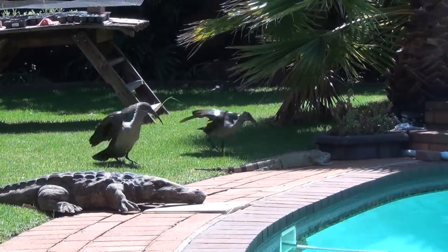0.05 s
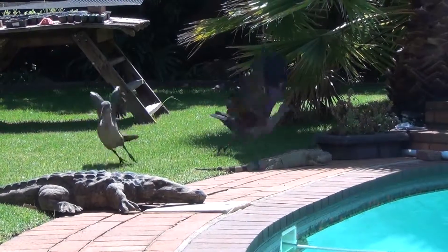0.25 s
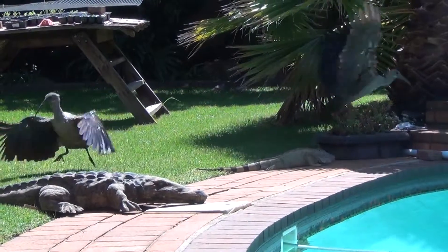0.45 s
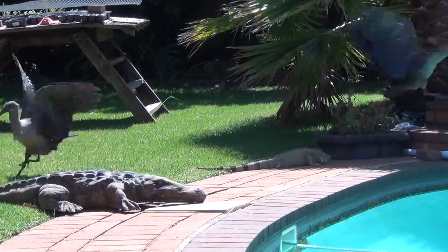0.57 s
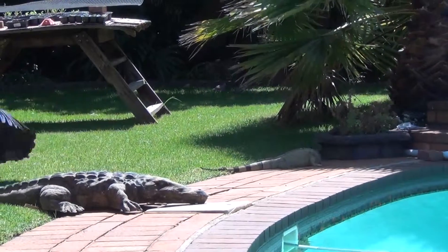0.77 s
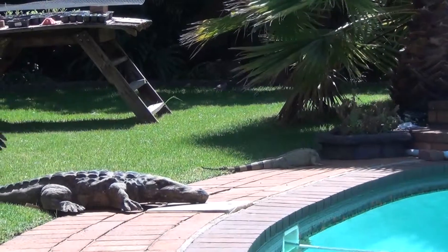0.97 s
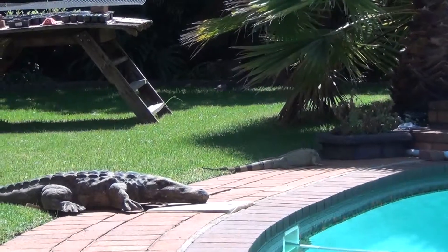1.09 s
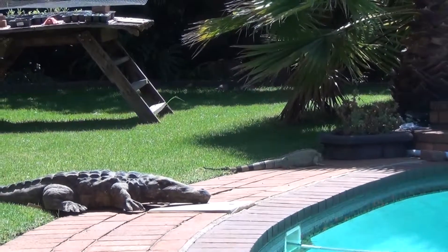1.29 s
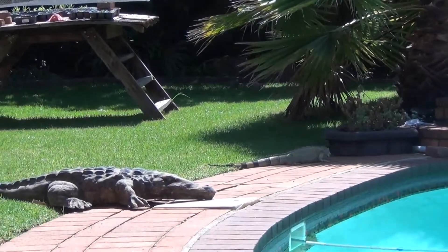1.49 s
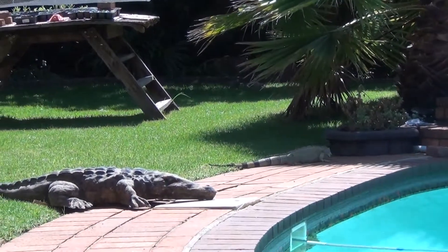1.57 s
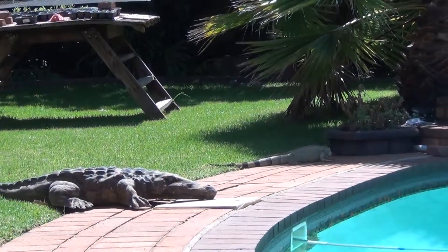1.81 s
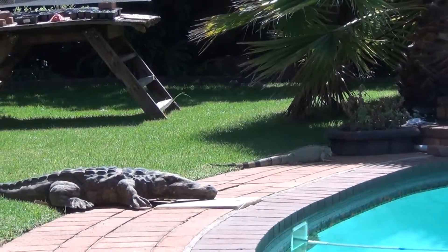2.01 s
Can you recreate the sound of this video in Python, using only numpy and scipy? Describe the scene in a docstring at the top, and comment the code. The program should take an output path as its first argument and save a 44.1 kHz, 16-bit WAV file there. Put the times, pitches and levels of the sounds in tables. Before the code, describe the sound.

Large birds flap their wings and take off, with faint pool water lapping behind.

```python
"""Large birds take off from a garden lawn beside a swimming pool.
Each wing stroke rustles the feathers and pushes a puff of air; in the first hard beats the wings clap,
and air squeezed from under them knocks. Bubbles plip and lap in the pool, small birds whistle and
chirp far off, and a little wind reaches the microphone towards the end."""
import sys
import numpy as np
from scipy import signal
from scipy.fft import rfft, irfft
from scipy.io import wavfile

SR = 44100
rng = np.random.default_rng(int(sys.argv[2]) if len(sys.argv) > 2 else 0)


def dump_mix(stems):
    """Bounce the given channels to the path in sys.argv[1] as a 16-bit WAV at rate SR."""
    frames = np.atleast_2d(stems).T  # one column per channel
    limited = np.clip(frames, -1, 1)  # hard clip at full scale
    pcm = np.round(limited * 32767).astype(np.int16)
    wavfile.write(sys.argv[1], SR, pcm)


N = 90404
TIME_S = np.arange(N) / SR
BINS_HZ = np.arange(N // 2 + 1) * SR / N

# Each row: peak time in seconds, rustle in dB, puff in dB, rise in seconds, fall in seconds.
WING_STROKES = [(0.126, -54, -60, 0.014, 0.023), (0.184, -50, -74, 0.0093, 0.015),
                (0.223, -45.5, -50, 0.019, 0.064), (0.289, -47.5, -71, 0.01, 0.013),
                (.334, -46, -47, 0.0062, 0.014), (0.381, -41.5, -44, 0.021, 0.026),
                (0.43, -42.5, -47.5, 0.016, .028), (0.506, -45.5, -60, 0.021, 0.039),
                (.575, -51.5, -53, 0.021, 0.13), (0.68, -41.5, -48, 0.017, 0.028),
                (0.762, -49.5, -52, 0.022, 0.042), (0.801, -50, -48.5, 0.01, 0.019),
                (0.856, -44.5, -49, 0.015, 0.053), (.977, -41, -51.5, 0.0082, 0.022),
                (1.096, -61, -54, 0.0032, 0.015), (1.165, -49, -79, 0.054, 0.12)]
# Each row: frequency in Hz, relative density in dB.
RUSTLE_SPECTRUM = [(400, 0), (1500, -6.5), (2500, -2), (4500, -4), (7000, -2.5), (8700, 0), (10700, 0),
                   (13000, -3), (15500, -24)]
# Each row: frequency in Hz, relative density in dB.
PUFF_SPECTRUM = [(60, -44), (130, -5.5), (210, -5.5), (320, -4), (450, -9), (720, -4), (1050, -14),
                 (1600, -8.5), (3000, -31)]
# Each row: frequency in Hz, left-right correlation.
WING_CORRELATION = [(200, .999), (800, 0.98), (1600, 0.96), (3000, 0.98), (6000, 0.92), (10000, 1)]

def wing_strokes():
    """Each stroke swells a feather rustle and a low puff of air together."""
    rustle = feathers(RUSTLE_SPECTRUM)
    puff = coloured(hiss(), PUFF_SPECTRUM, WING_CORRELATION)
    return sum(swell(s, rise_s, fall_s) * (from_db(rustle_db) * rustle + from_db(puff_db) * puff)
               for s, rustle_db, puff_db, rise_s, fall_s in WING_STROKES)


def feathers(spectrum):
    """Barbs slip over each other while air hisses through the vanes."""
    barbs = grains(per_s=5600, spread_db=2.5)
    return coloured(barbs + 0.75 * hiss(), spectrum, WING_CORRELATION)


# Each row: peak time in seconds, level in dB, treble lift in dB, rise in seconds, fall in seconds.
WING_CLAPS = [(0.3344, -35.5, -3, 0.0014, .0018), (0.3674, -31.5, -3, 0.0019, .0025),
              (0.3696, -28.5, -4.5, 0.00078, .0035), (.3746, -27.5, -7, 0.0008, 0.0041),
              (0.411, -40.5, 15.5, 0.0026, .002), (0.4123, -26.5, 3, 0.00017, 0.0015),
              (0.4137, -22.5, 0, 0.00092, 0.0019), (0.419, -30.5, 1.5, 0.00088, 0.0085)]
# Each row: frequency in Hz, relative density in dB.
SLAP_SPECTRUM = [(500, -22), (1100, -2), (1500, -14), (2200, -2.5), (5500, -1.5), (7200, -4.5),
                 (8500, -1.5), (10500, 2), (13000, -4), (15500, -12)]

def wing_claps(treble_above_hz=6040):
    """Flight feathers meet in a quick run of slaps, each a few milliseconds long."""
    slap = feathers(SLAP_SPECTRUM)
    body = signal.sosfiltfilt(signal.butter(2, treble_above_hz, fs=SR, output="sos"), slap)
    treble = slap - body
    return sum(from_db(db) * swell(s, rise_s, fall_s) * (body + from_db(lift_db) * treble)
               for s, db, lift_db, rise_s, fall_s in WING_CLAPS)


# Each row: peak time in seconds, pitch in Hz, level in dB, rise in seconds, fall in seconds.
WING_AIR_PULSES = [(.323, 263, -43, .003, .004), (.335, 740, -39, 0.0017, 0.0016),
                   (.3665, 232, -37, 0.0021, 0.0025), (.3735, 700, -36.5, 0.0027, 0.0033),
                   (.379, 217, -40.5, 0.0024, .005), (.4122, 713, -23.5, 0.00098, 0.0047),
                   (.4165, 254, -30.5, 0.0017, 0.0039), (.431, 700, -34, 0.00067, 0.005),
                   (.4455, 205, -38, 0.0022, 0.0074), (.474, 219, -36.5, 0.0026, 0.0027),
                   (.657, 625, -41.5, .004, 0.0063), (.6665, 219, -35.5, .003, .007),
                   (.683, 198, -38, 0.0033, 0.006), (.802, 299, -44, 0.0042, 0.015),
                   (.836, 695, -39.5, 0.0021, 0.0054), (.847, 320, -37.5, 0.0047, 0.0045),
                   (.85, 640, -38.5, .003, 0.0037), (.861, 804, -56, 0.0034, .004),
                   (.864, 199, -43, 0.0061, 0.0073), (.875, 819, -41.5, 0.0027, 0.013),
                   (.895, 215, -45, .004, 0.0045), (1.1, 183, -46.5, 0.0051, 0.013)]

def trapped_air(turbulence=0.25):
    """Air forced from under the wings knocks and whumps; the size of the pocket sets the pitch."""
    out = 0
    for s, hz, db, rise_s, fall_s in WING_AIR_PULSES:
        eddies = unit_rms(resonate(hiss()[0], hz, hz / 2))
        pressure = np.sin(2 * np.pi * hz * (TIME_S - s)) + turbulence * eddies
        out += from_db(db) * swell(s, rise_s, fall_s) * pressure
    return out


def quill_flick(peak_s=0.9686, level_db=-32.5):
    """One quill slides past another with a very short, high zip."""
    band = resonate(hiss()[0], hz=10380, width_hz=630)
    zip_tone = unit_rms(np.cos(np.angle(signal.hilbert(band))))  # constant amplitude
    return from_db(level_db) * zip_tone * swell(peak_s, rise_s=0.0014, fall_s=0.0014)


# Each row: frequency in Hz, relative gain in dB.
ECHO_SPECTRUM = [(100, -7), (300, 0.5), (700, -2), (1500, -4), (3000, 0.5), (6000, 0.5), (11000, -5),
                 (16000, -2)]
# Each row: frequency in Hz, left-right correlation.
ECHO_CORRELATION = [(200, .998), (800, 0.89), (3000, .55), (6000, 0.42), (10000, 0.73)]

def reflections(x, level_db=-11, delay_s=0.011, t60_s=0.4):
    """Paving, fence and palms scatter back a short, weak wash."""
    decay = np.exp(-np.log(1000) * TIME_S / t60_s) * (TIME_S > delay_s)
    tail = coloured(hiss(), ECHO_SPECTRUM, ECHO_CORRELATION) * decay
    tail /= np.sqrt(np.sum(tail ** 2) / 2)
    return from_db(level_db) * signal.fftconvolve(x, tail, axes=1)[:, :N]


# Each row: start in seconds, bubble in dB, pitch in Hz, ring decay in seconds, splash in dB.
POOL_PLIPS = [(.583, -43, 1900, .003, -64), (.652, -40, 1900, 0.0034, -52), (.654, -44, 1530, 0.0078, -66),
              (.668, -37, 1530, 0.0078, -46), (.683, -39, 1410, .005, -43),
              (.691, -39.5, 1660, 0.0053, -50), (.704, -41, 1670, 0.009, -56),
              (.738, -49, 1446, 0.0042, -42), (.951, -39, 1614, 0.0032, -49),
              (1.028, -57, 1850, 0.0018, -43.5), (1.122, -45.5, 1590, .004, -65),
              (1.137, -47, 1660, 0.0064, -65), (1.157, -45, 1650, .004, -55), (1.247, -43, 1670, .005, -69),
              (1.291, -41, 1595, .005, -69), (1.302, -34, 1680, 0.0042, -56), (1.357, -43, 1016, 0.01, -51),
              (1.445, -43, 1690, .005, -59), (1.4659, -34.5, 1527, 0.0056, -43.5),
              (1.491, -38.5, 1640, 0.0024, -64), (1.6405, -43, 1630, .003, -55),
              (1.6675, -42, 1640, .003, -48), (1.7178, -41.5, 1670, 0.0061, -58),
              (1.754, -36, 1645, 0.0053, -45), (1.7607, -34.5, 1487, 0.0052, -69),
              (1.764, -39, 856, 0.006, -67), (1.8225, -46, 3190, .002, -46), (1.827, -45, 1400, .0015, -48),
              (1.832, -39, 1850, 0.001, -52), (1.838, -50, 2830, .0015, -58),
              (1.8435, -43, 1580, .002, -52), (1.846, -46, 2650, .0015, -62),
              (1.918, -46, 2820, .0015, -50), (1.9457, -41, 1300, 0.0063, -63),
              (1.982, -57, 1930, .002, -46), (2.0028, -45, 1440, .003, -47)]
# Each row: frequency in Hz, relative density in dB.
SPLASH_SPECTRUM = [(600, -9), (1600, 4), (2600, -0.5), (4500, -10), (8000, -14), (14000, -40)]
# Splashes and garden air. Each row: frequency in Hz, left-right correlation.
AMBIENT_CORRELATION = [(60, 1), (400, 0.99), (1000, 0.88), (2500, 0.58), (5000, 0.33), (12000, 0.83)]

def water_plips(rise_s=0.00087, glide_per_s=5.8, fizz=0.049, tick_s=0.0049):
    """The surface breaks with a tick and a bubble rings, rising in pitch, with a little fizz."""
    splash = coloured(hiss(), SPLASH_SPECTRUM, AMBIENT_CORRELATION)
    out = 0
    for s, bubble_db, hz, ring_s, splash_db in POOL_PLIPS:
        age_s = np.clip(TIME_S - s, 0, 10 * ring_s)
        ring = np.sin(2 * np.pi * hz * age_s * (1 + glide_per_s * age_s / 2)) + fizz * splash
        bubble = pan(left_db=-2) * ring * swell(s + 2 * rise_s, rise_s, ring_s)
        tick = splash * swell(s, tick_s / 10, tick_s)
        out += from_db(bubble_db) * bubble + from_db(splash_db) * tick
    return out


# Each row: bubble pitch in Hz, relative level in dB.
LAP_BUBBLES = [(700, -11), (1000, -13), (1600, 1), (2400, -8), (4500, -18), (7000, -20)]
# Each row: time in seconds, level in dB.
LAP_LEVELS = [(0, -58), (.6, -54.5), (1.1, -57.5), (1.36, -57), (1.54, -55.5), (1.85, -54), (2.05, -60.5)]

def lapping(bubbles_per_s=450, q=8.6, pan_db=4.5):
    """Small bubbles of many sizes burst at random along the pool's edge, to either side."""
    pitches_hz = np.geomspace(LAP_BUBBLES[0][0], LAP_BUBBLES[-1][0], 20)
    bubbles = 0
    for hz in pitches_hz:
        bursts = grains(bubbles_per_s / len(pitches_hz), spread_db=0.5)
        bubbles += from_db(at_hz(LAP_BUBBLES, hz)) * unit_rms(resonate(bursts, hz, hz / q))
    right, left = bubbles
    return envelope(LAP_LEVELS) * unit_rms(pan(-pan_db) * right + pan(pan_db) * left)


# Each row: time in seconds, pitch in Hz, level in dB.
WHISTLE_CONTOUR = [(.04, 2720, -62), (.048, 2540, -57), (0.071, 2350, -57), (.096, 2240, -58),
                   (0.124, 2075, -57), (.134, 2100, -65), (.16, 1990, -74)]

def far_whistle(wobble_rms_hz=55):
    """A distant bird gives one thin, slightly unsteady falling whistle."""
    s, hz, db = np.transpose(WHISTLE_CONTOUR)
    wobble_hz = wobble_rms_hz * unit_rms(resonate(hiss()[0], hz=120, width_hz=120))
    pitch_hz = np.interp(TIME_S, s, hz) + wobble_hz
    tone = unit_rms(np.sin(2 * np.pi * np.cumsum(pitch_hz) / SR))
    gate = (TIME_S > s[0]) & (TIME_S < s[-1])
    return tone * from_db(np.interp(TIME_S, s, db)) * gate


# Each row: peak time in seconds, pitch in Hz, level in dB.
BIRD_CHIRPS = [(1.411, 6530, -61), (1.62, 6550, -65), (1.66, 4500, -63), (1.815, 6400, -66),
               (1.885, 4300, -61)]

def far_chirps(width_hz=380):
    """Small birds call in thin high notes, blurred by distance."""
    out = 0
    for s, hz, db in BIRD_CHIRPS:
        band = resonate(hiss()[0], hz, width_hz)
        note = unit_rms(resonate(band, hz, width_hz))
        out += from_db(db) * swell(s, rise_s=0.018, fall_s=0.018) * note
    return out


# Each row: time in seconds, level in dB.
GUST_LEVELS = [(1.41, -77), (1.47, -55), (1.55, -78), (1.7, -100), (1.88, -50), (1.94, -61), (2.03, -47.5)]
# Each row: frequency in Hz, relative density in dB.
GUST_SPECTRUM = [(25, -34), (45, 7), (85, 9.5), (160, 2.5), (400, -38)]
# Each row: frequency in Hz, left-right correlation.
GUST_CORRELATION = [(40, 1), (150, 0.88)]

def wind_gusts():
    """Light wind rumbles on the microphone."""
    return envelope(GUST_LEVELS) * coloured(hiss(), GUST_SPECTRUM, GUST_CORRELATION)


# Each row: frequency in Hz, relative density in dB.
GARDEN_SPECTRUM = [(25, -18), (40, -11.5), (70, -2.5), (130, -1), (260, -2.5), (450, -8), (750, -4.5),
                   (1100, -7.5), (1600, -12), (2400, -17), (4000, -18.5), (7000, -22.5), (11000, -23),
                   (14000, -24.5), (15500, -136)]

def garden_air(level_db=-49):
    """A steady outdoor hush."""
    return from_db(level_db) * coloured(hiss(), GARDEN_SPECTRUM, AMBIENT_CORRELATION)


# Each row: frequency in Hz, relative density in dB.
MIC_NOISE_SPECTRUM = [(25, 6), (60, -29), (150, -29), (400, 17), (1500, 8), (6000, 7), (14000, -15),
                      (15500, -40)]

def mic_noise(level_db=-79):
    """Each microphone adds its own faint rumble and hiss."""
    return from_db(level_db) * coloured(hiss(), MIC_NOISE_SPECTRUM, correlation=[(1, 0.017)])


def from_db(db):
    """Decibels to gain."""
    return 10 ** (np.asarray(db) / 20)


def unit_rms(x):
    """Scale to unit power."""
    return x / np.sqrt(np.mean(x ** 2) + 1e-20)


def at_hz(points, hz):
    """Read a table on a log-frequency axis."""
    points_hz, values = np.transpose(points)
    return np.interp(np.log(hz + 1e-3), np.log(points_hz), values)


def envelope(levels):
    """Gain over time from rows of seconds and dB."""
    return from_db(np.interp(TIME_S, *np.transpose(levels)))


def swell(peak_s, rise_s, fall_s):
    """Gaussian rise, exponential fall."""
    t = TIME_S - peak_s
    return np.exp(np.where(t < 0, -0.5 * (t / rise_s) ** 2, -np.abs(t / fall_s)))


def hiss():
    """Two independent white noises."""
    return rng.standard_normal((2, N))


def grains(per_s, spread_db):
    """Two random click trains of uneven strength."""
    size = from_db(spread_db * np.minimum(rng.exponential(1, (2, N)), 5))
    return unit_rms(size * np.sign(hiss()) * (rng.random((2, N)) < per_s / SR))


def resonate(x, hz, width_hz):
    """One resonance with unit peak gain."""
    r = np.exp(-np.pi * width_hz / SR)
    feedforward = np.array([1, 0, -1]) * (1 - r * r) / 2
    feedback = [1, -2 * r * np.cos(2 * np.pi * hz / SR), r * r]
    return signal.lfilter(feedforward, feedback, x + 1e-18)


def coloured(pair, spectrum, correlation):
    """Shape two independent signals as mid and side; return left and right at unit rms."""
    low_rolloff = np.minimum(BINS_HZ / spectrum[0][0], 1) ** 2
    gain = from_db(at_hz(spectrum, BINS_HZ)) * low_rolloff
    alike = np.clip(at_hz(correlation, BINS_HZ), 0, 1)
    mid, side = irfft(rfft(pair) * gain * np.sqrt([1 + alike, 1 - alike]), N)
    return unit_rms(np.array([mid + side, mid - side]))


def pan(left_db):
    """Channel gains for a left-minus-right level."""
    return from_db(np.array([[left_db], [-left_db]]) / 2)


def lean(x, balance, left_lag_us=3.8):
    """Tilt the left-right balance by frequency and delay the left side."""
    gain = from_db(at_hz(balance, BINS_HZ) / 2)
    lag = np.exp(-2j * np.pi * BINS_HZ * left_lag_us / 1e6)
    return irfft(rfft(x) * np.array([gain * lag, 1 / gain]), N)


# Each row: frequency in Hz, left minus right in dB.
WING_PAN = [(700, -0.5), (1600, 1.5), (3000, 0.5), (6000, .2), (12000, 0)]
# Each row: frequency in Hz, left minus right in dB.
GARDEN_PAN = [(700, 0), (1500, -1), (3000, 3), (6000, 3), (12000, 0)]

def scene():
    """Wings with their reflections, over the pool and the garden."""
    wings = wing_strokes() + wing_claps() + trapped_air() + quill_flick()
    wings = lean(wings + reflections(wings), WING_PAN)
    garden = wind_gusts() + garden_air() + far_chirps() + pan(left_db=7.5) * far_whistle()
    return wings + lean(garden, GARDEN_PAN) + water_plips() + lapping() + mic_noise()


def record(dry):
    """A steep low-pass cuts the top."""
    cutoff_hz = 15600
    return signal.sosfilt(signal.ellip(10, 0.1, 80, cutoff_hz, fs=SR, output="sos"), dry)


dry = scene()
out = record(dry)
dump_mix(out)
```